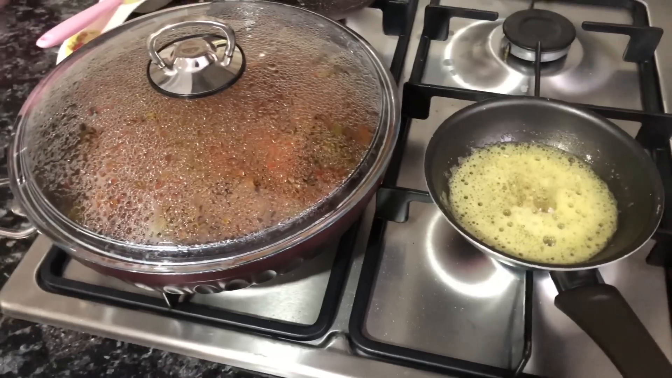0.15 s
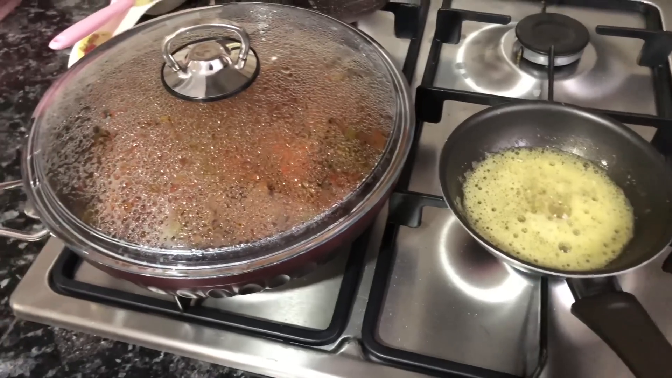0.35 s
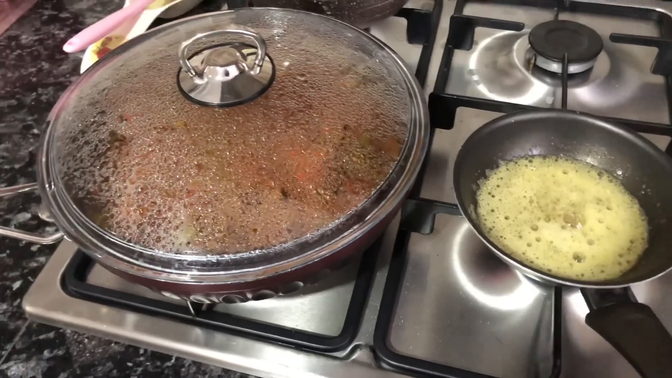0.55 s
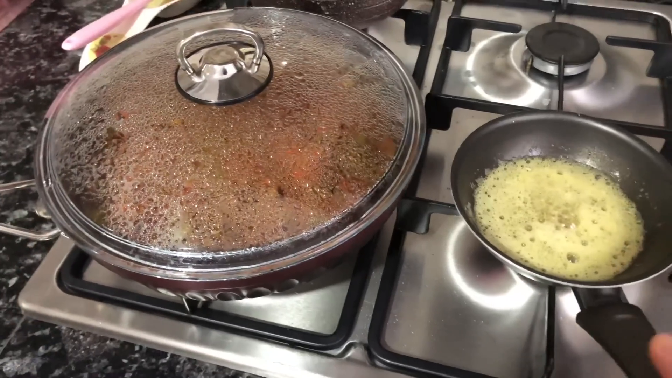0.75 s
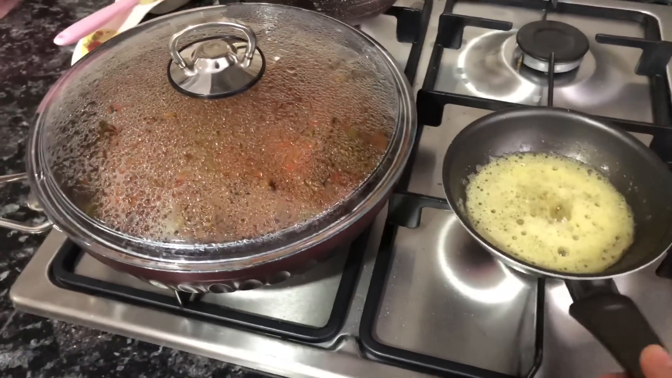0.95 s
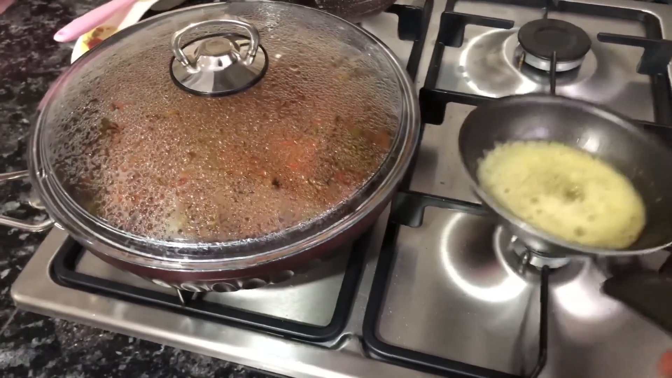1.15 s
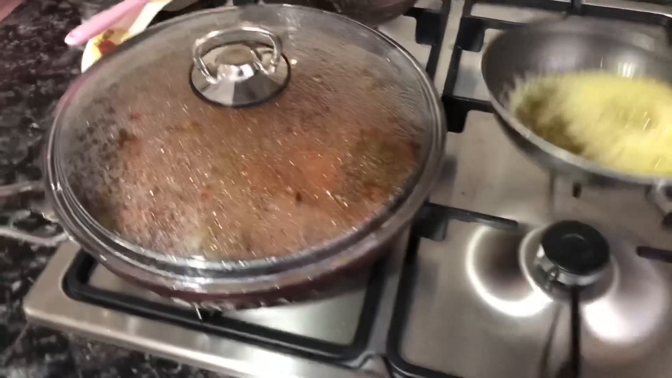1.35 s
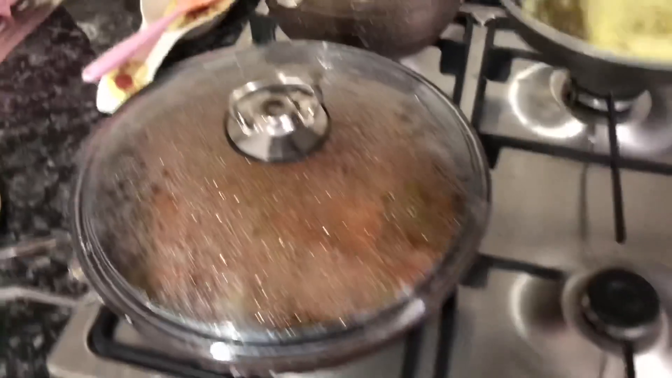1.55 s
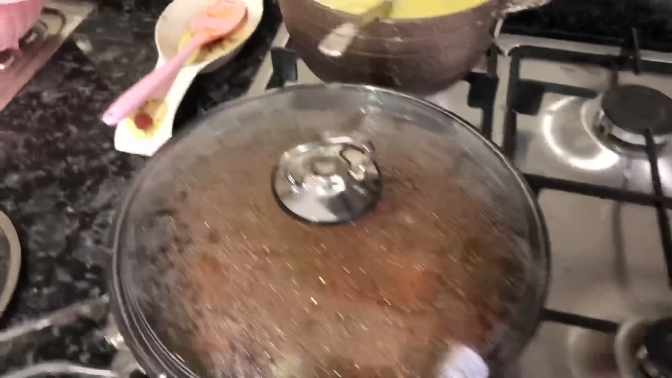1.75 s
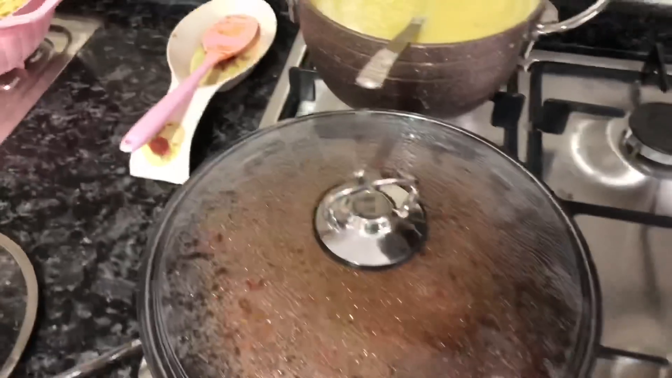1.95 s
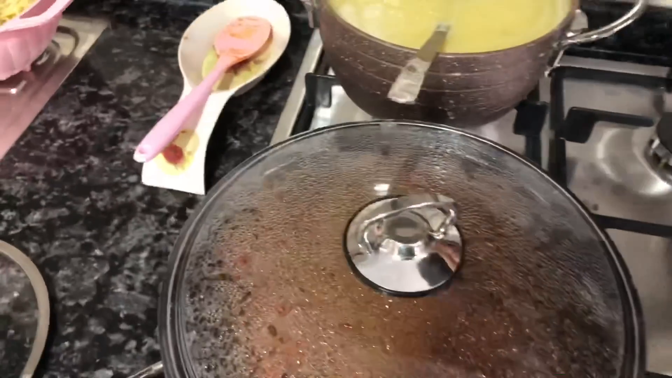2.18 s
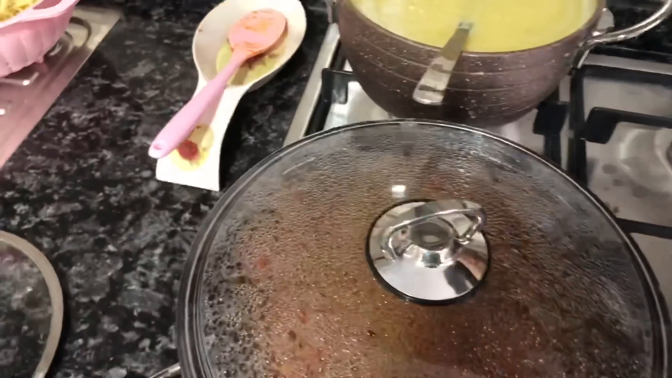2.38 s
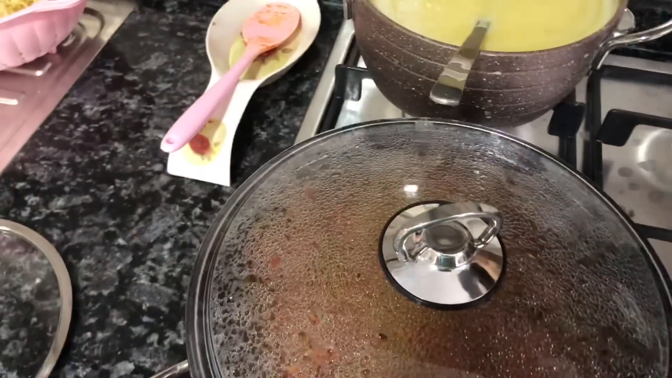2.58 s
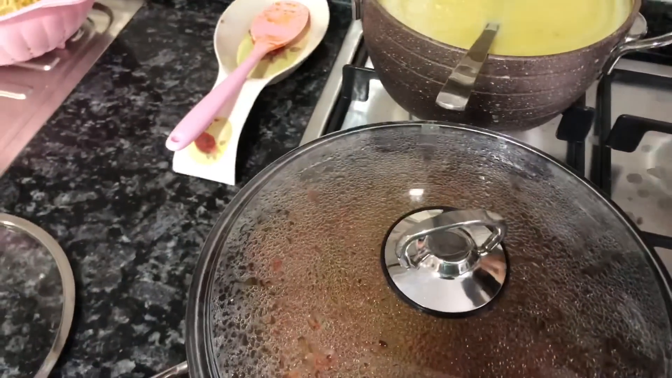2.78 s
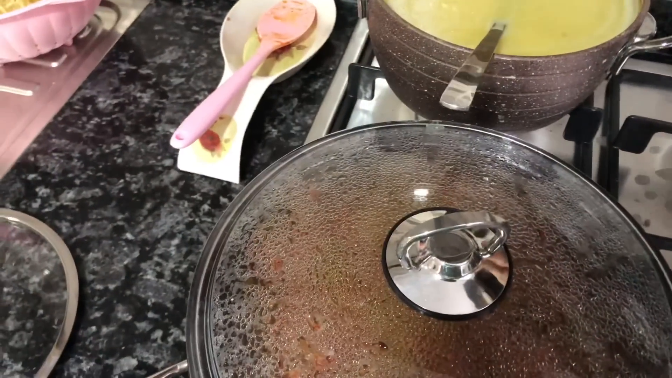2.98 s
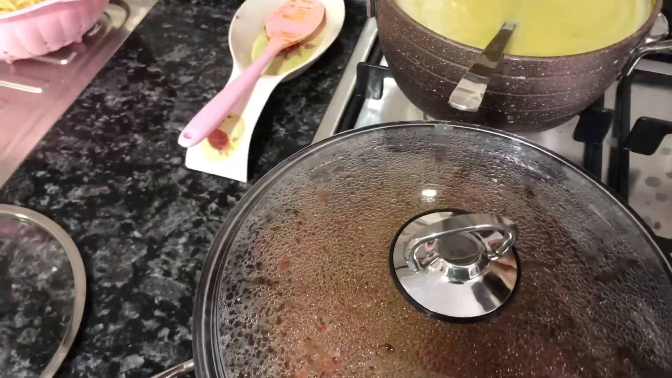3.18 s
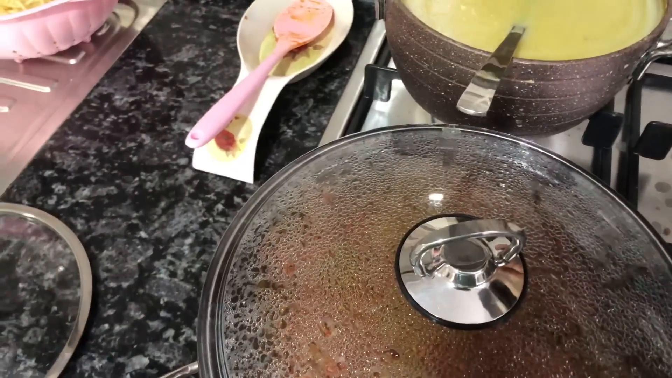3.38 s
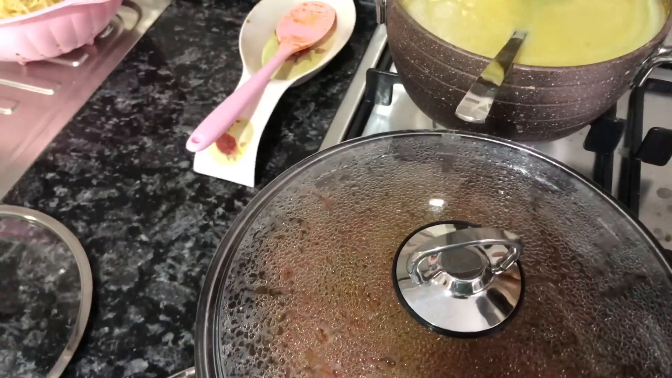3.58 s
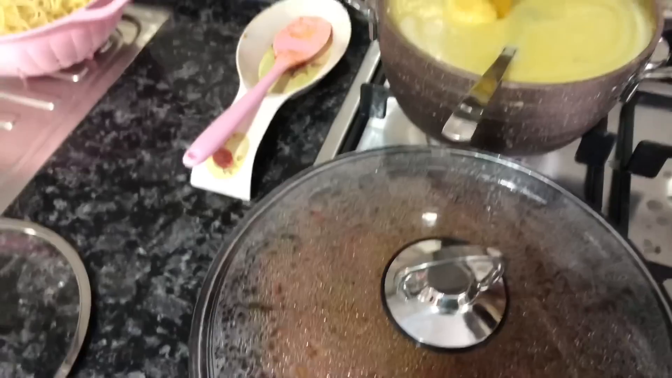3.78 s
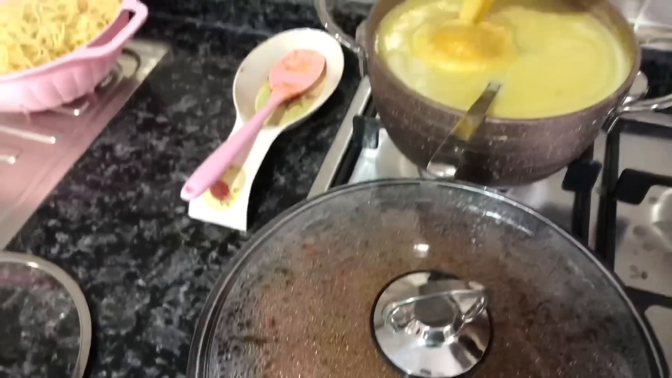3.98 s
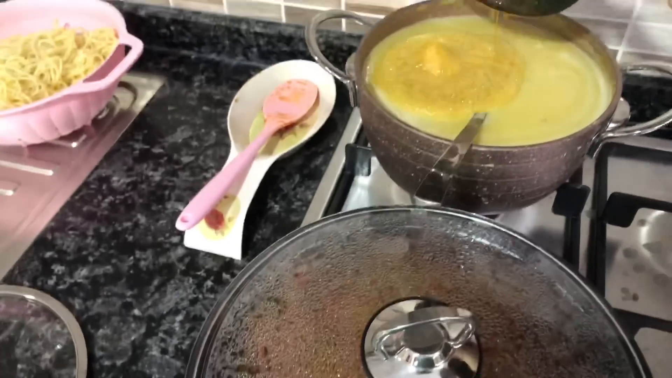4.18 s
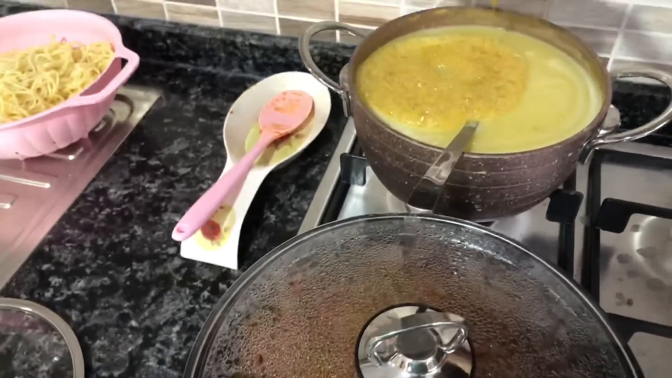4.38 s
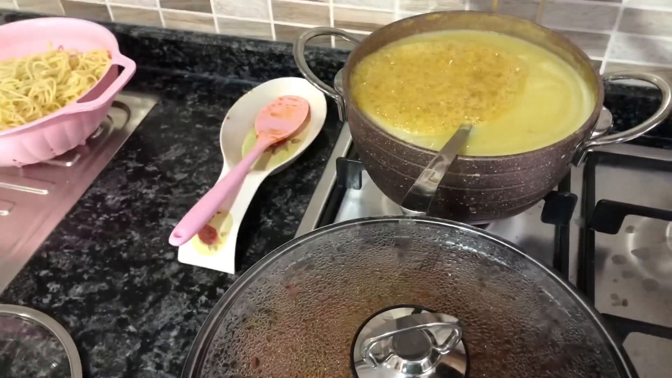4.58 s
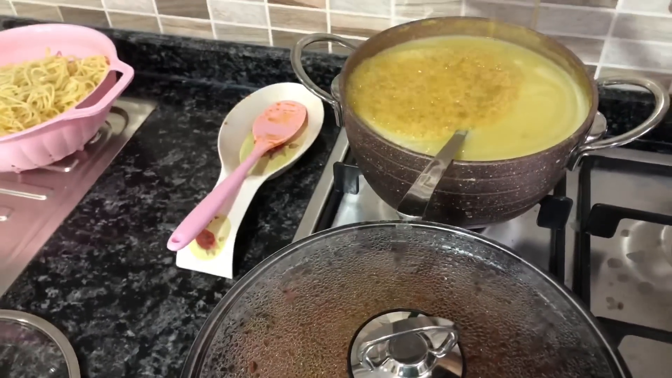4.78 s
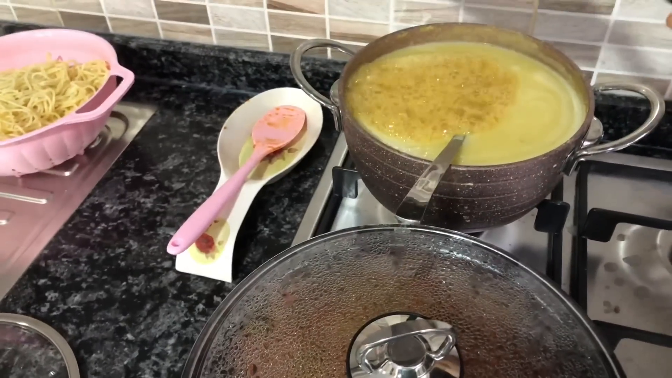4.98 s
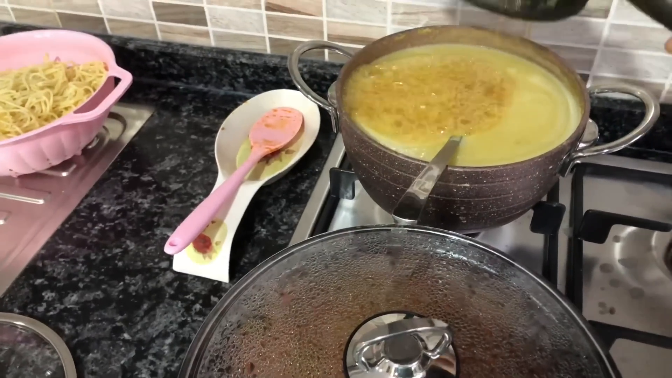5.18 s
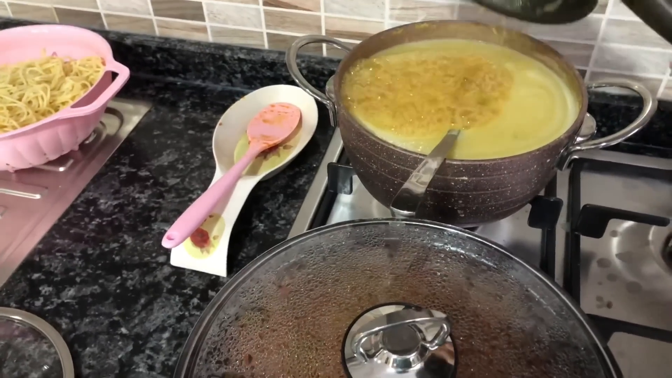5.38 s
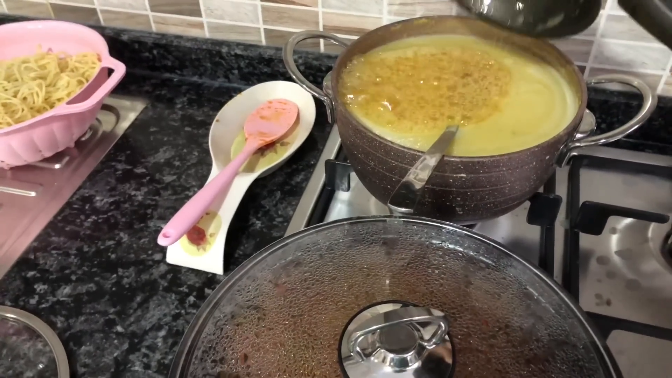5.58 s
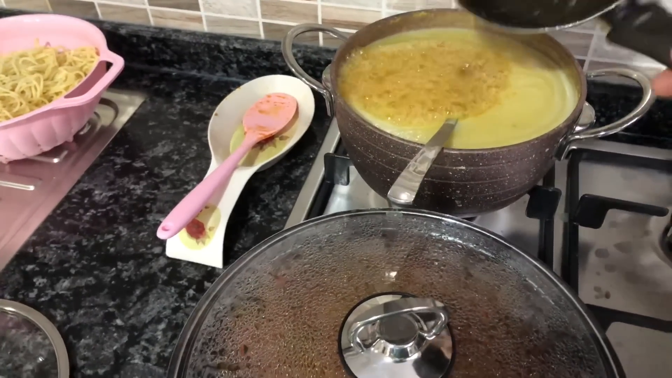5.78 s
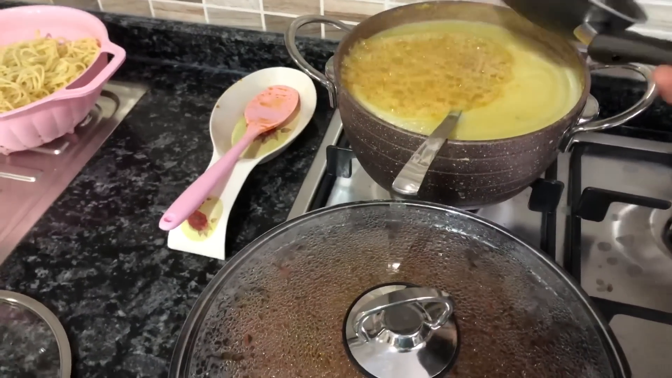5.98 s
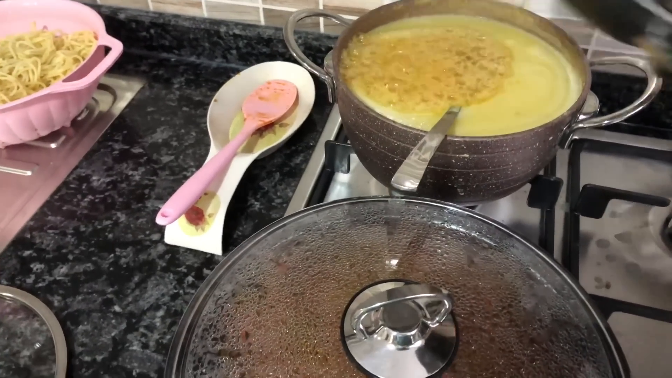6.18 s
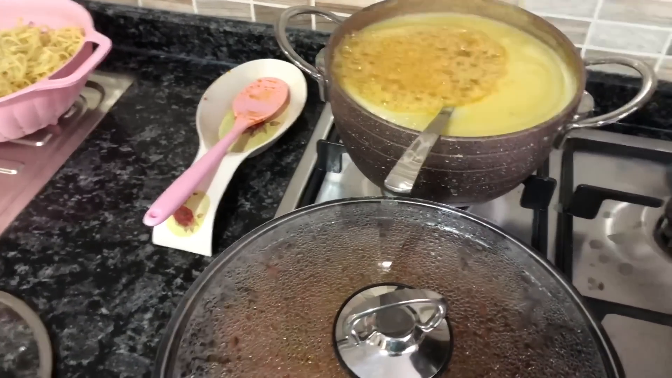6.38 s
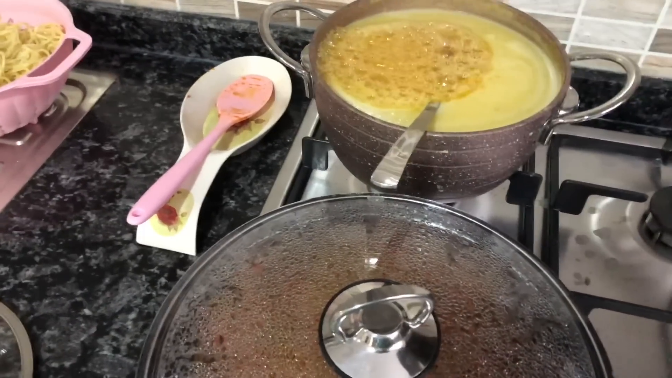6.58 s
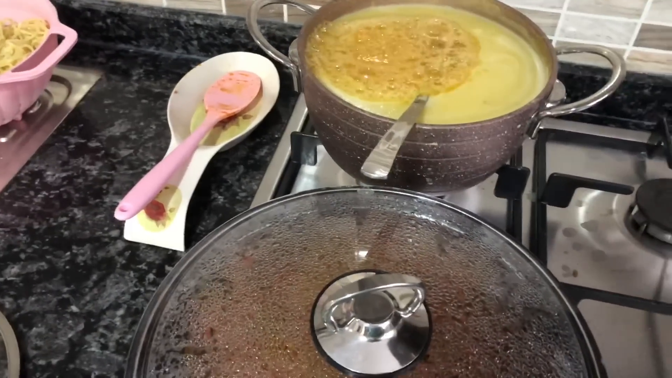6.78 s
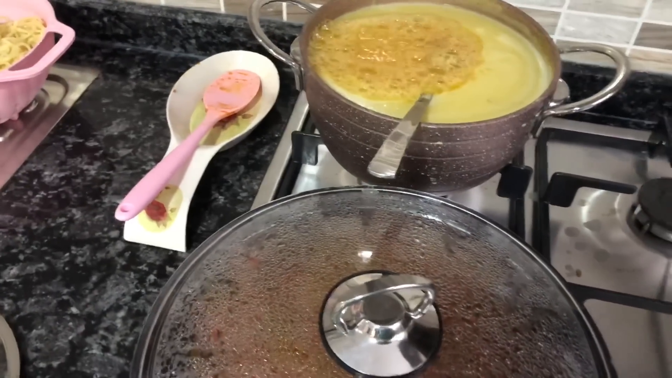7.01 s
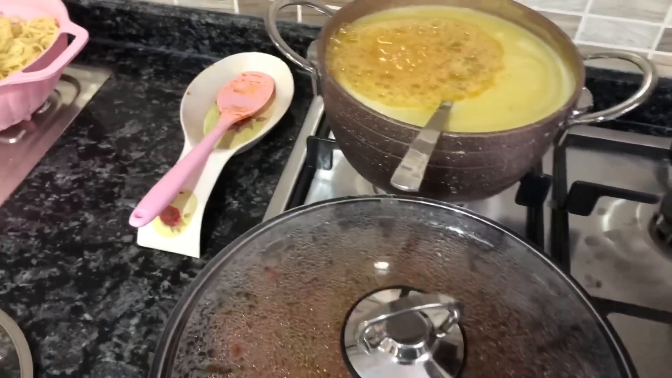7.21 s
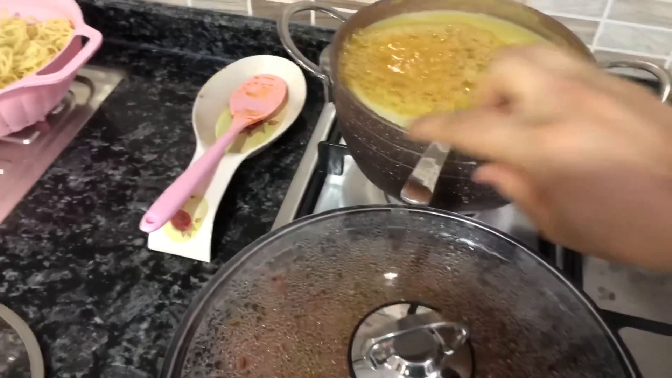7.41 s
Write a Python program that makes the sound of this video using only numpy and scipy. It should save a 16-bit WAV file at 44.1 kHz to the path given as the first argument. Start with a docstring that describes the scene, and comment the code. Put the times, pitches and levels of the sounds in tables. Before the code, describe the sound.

Close up in a small kitchen, a metal pan rattles and scrapes on a stove grate while butter faintly fizzes and spits. Isolated snaps quicken, then hot fat hits soup in a huge distorted sizzle. It thins to crisp, scattered pops; the pan clinks hard on the pot, followed by a small knock and scrape. A low fan hum stays underneath.

```python
"""Butter poured on soup

Butter crackles and foams in a small pan that rattles, scrapes and knocks on the grate of a gas stove.
Tipped over a pot of soup, first drops spit, then fat roars into overload and thins to single pops; a fan hums.
Fat is short noise bursts over dense filtered clicks and hiss; metal is struck or rubbed resonances,
and the kitchen is banded noise with a short tail. The pan clinks on the pot near the end.
"""
import sys
import numpy as np
from scipy import signal
from scipy.io import wavfile

SR = 44100
rng = np.random.default_rng(int(sys.argv[2]) if len(sys.argv) > 2 else 0)


def how_loud(loudness_db):
    """Turn decibels into a plain amplitude multiplier (0 dB gives 1, 20 dB gives 10)."""
    steps = np.asarray(loudness_db, float) / 20
    return 10 ** steps


def wav_record(signal):
    """Record a signal, one row per channel, as 16-bit PCM in the file named by sys.argv[1]."""
    frames = np.transpose(np.atleast_2d(signal))
    bounded = np.clip(frames, -1, 1)
    # unit amplitude maps onto the largest positive 16-bit level
    quanta = np.round(bounded * 32767).astype(np.int16)
    wavfile.write(sys.argv[1], SR, quanta)


N = 328545

# roar of fat on soup over time: time_s, roar_db, treble_db (above 9 kHz, relative to the roar)
SIZZLE = [(3.44, -47, -8), (3.64, -21.5, -7), (3.81, -10, -5), (4.06, -3.5, -6), (4.35, -9.5, -9),
          (4.75, -18, -8.5), (4.95, -22, -9.5), (5.2, -24, -9), (5.4, -29, -5), (6.0, -37.5, -6),
          (6.62, -40, -3.5), (6.8, -44.5, -2), (7.45, -49, -5)]
# resonances of the stove's hob sheet: mode_hz, width_hz, gain_db
HOB = [(112, 28, -9), (156, 18, -10.5), (190, 60, -8.5), (249.4, 49, -4.5), (316, 17.7, 0), (391, 9.8, -8)]
# resonances of the grate: mode_hz, width_hz, gain_db
GRATE = [(528, 18, 0), (672, 30, -11), (860, 60, -17), (1020, 30, -11), (1175, 40, -12), (1348, 20, -9),
         (1535, 30, -17), (1900, 100, -22), (2300, 200, -24)]
# loudest single pops of fat, in the pan and then on the soup:
# time_s, peak_db, pitch_hz, dull_db (thud relative to the snap), tick_db (bright tick relative to the snap)
POPS = [(0.1364, -39, 9910, -20, 3), (0.456, -31.5, 2260, -17, 4), (.6661, -30.5, 13400, -19, -11),
        (.8573, -29, 2380, -6, 1), (.9696, -21.5, 7000, -13.5, -12), (1.0715, -24, 4050, -7.5, -21),
        (1.1583, -18, 8050, -17.5, -13), (1.4304, -26.5, 10030, -6, -16), (1.4537, -26, 4440, -10, -7),
        (1.509, -19.5, 6300, -15, -7), (1.66, -31.5, 5120, -24, -13), (1.594, -26, 4600, -14, -15),
        (2.0078, -28.5, 10160, -26, -12), (2.073, -17.5, 5600, -39, -32), (2.1738, -12.5, 3220, -29, -11.5),
        (2.215, -18.5, 3100, -22, -7), (2.317, -25.5, 7800, -26, -20), (2.4606, -22, 5340, -31, -1),
        (2.5207, -29, 4180, -13, -12), (2.048, -29.5, 3960, -21, -3), (1.6296, -32.5, 3700, -9, -22),
        (2.5487, -28.5, 2650, -19, -4), (2.7485, -28, 6800, -10, -3), (2.6123, -17, 5760, -13, -5),
        (2.6222, -13, 5400, -43, 0), (2.6955, -23, 9500, -21, -10), (2.766, -19.5, 6640, -17, -7),
        (2.7808, -20, 6120, -13, -6), (2.8102, -14, 9000, -16, -7), (2.813, -8.5, 5830, -17.5, -4),
        (3.1384, -21.5, 3860, -6.5, -1), (3.2065, -20.5, 6900, -7.5, -4), (3.2107, -19.5, 5130, -32, -20),
        (3.3044, -13, 3340, -35, -7), (3.357, -7, 4200, -53, -22), (3.422, -11, 6000, -23, -21),
        (3.4254, -4.5, 3080, -6, -11.5), (3.4847, -18, 4840, -6, -26), (3.4962, -0.5, 4200, -23, -34),
        (3.5465, -10, 6100, -7, -9), (3.5625, -20, 1500, -16, -10), (3.588, -14.5, 2980, -3, -13),
        (3.669, -8, 4500, -4, -3.5), (3.612, -1, 5300, -10, -5), (3.6483, 2, 5300, -8, -3.5),
        (3.7105, 2.5, 4740, -8, -4), (4.791, 6.5, 5170, -18, -8.5), (4.831, -1, 6330, -23, -3),
        (4.9471, 1.5, 6550, -18, -5), (5.0586, -13, 5900, -11.5, 5), (5.166, -.5, 5200, -31, -28),
        (5.2552, -4.5, 2700, -3.5, -14), (5.2943, -1.5, 4400, -8, -11), (5.338, -4.5, 5860, -7, -5),
        (5.3757, -5.5, 4520, -8.5, -16), (5.4165, -4.5, 5960, -16, -6), (5.4756, -7.5, 5950, -27, -22.5),
        (5.5147, -1.5, 6040, -36, -15.5), (5.587, -8.5, 3430, -7, -26), (5.63, -7, 4670, -5, -13),
        (5.691, -2.5, 6500, -13.5, -1.5), (5.752, -14, 2180, 6.5, -21), (5.7631, -5.5, 5100, -10, -20),
        (5.827, -8, 4450, -14, -22), (5.8811, -5, 3460, -6, -28), (5.998, -8, 4850, -11.5, -9),
        (6.0486, -9.5, 6940, -14.5, -9), (6.1534, -8, 2000, 0, -8), (6.1842, -10.5, 5640, -13, -27),
        (6.2012, -10, 6660, -37, -1), (6.2141, -4.5, 6700, -18, 1), (6.253, -8.5, 12400, -17, -6),
        (6.268, -11, 5800, -3, -10), (5.01, -9.5, 11400, -28, -3), (5.789, -14, 14300, -21, -6),
        (6.13, -19.5, 7060, -23, -15), (6.2988, -18, 12360, -32, -13), (7.154, -20, 10940, -8.5, -11),
        (6.3278, -11.5, 6800, -9.5, -11), (6.55, -11, 6940, -20, -12), (6.6493, -16, 7960, -7, -15),
        (6.731, -13.5, 5570, -21, -19), (6.772, -13.5, 11800, -18, -30), (6.8533, -15.5, 5800, -6.5, -32),
        (6.9733, -4, 6160, -15, -2), (7.0134, -24, 1530, 12.5, 12), (7.1282, -11.5, 5600, -16, -21),
        (7.1402, -11, 6800, -15, -20), (7.182, -12, 5040, -8.5, -16)]
TIPPED_S, POURED_S = 3, 4   # pops move from pan to soup; after the first lone drops


def rms_one(x):
    """Scales a signal to an rms of 1."""
    return x / np.sqrt(np.mean(x ** 2) + 1e-20)


def in_time(rows, outside=None):
    """Draws each column of a time table as a curve over the scene."""
    s, *columns = np.transpose(rows)
    return [np.interp(np.arange(N) / SR, s, c, outside, outside) for c in columns]


def at_hz(points, hz):
    """Reads a colour curve along log frequency."""
    curve_hz, curve_db = np.array(points)[:, 0], np.array(points)[:, 1]
    return np.interp(np.log(hz), np.log(curve_hz), curve_db)


def drift(pole_hz):
    """Slow random wander with an rms of 1: noise through two equal low-pass poles."""
    r = np.exp(-80 * np.pi * pole_hz / SR)   # one step is 40 samples
    noise = rng.standard_normal(N // 40 + 2002)
    slow = signal.lfilter([1], [1, -2 * r, r * r], noise)[2000:]
    return np.interp(np.arange(N) / 40, np.arange(len(slow)), rms_one(slow))


def resonate(x, hz, width_hz):
    """One mode: a click of 1 rings as a dying sine that starts from a height of 1."""
    r = np.exp(-np.pi * width_hz / SR)
    w = 2 * np.pi * min(hz, .45 * SR) / SR
    return signal.lfilter([0, np.sin(w)], [1, -2 * r * np.cos(w), r * r], x + 1e-18)


def body(x, modes):
    """Parallel resonances of alternating sign, each with about its gain in dB at its top."""
    out = 0
    for k, (hz, width_hz, gain_db) in enumerate(modes):
        gain = how_loud(gain_db) * 2 * np.pi * width_hz / SR
        out = out + (-1) ** k * gain * resonate(x, hz, width_hz)
    return out


def cut(x, hz, kind, order=2):
    """Butterworth filter."""
    return signal.sosfilt(signal.butter(order, hz, kind, fs=SR, output="sos"), x)


def grains(per_s, spread_db):
    """Random clicks of either sign, most small and a few large."""
    size = how_loud(spread_db * np.minimum(rng.exponential(1, N), 4.0))
    size = size * rng.choice([-1, 1], N)
    fires = rng.random(N) < per_s / SR
    return size * fires / np.sqrt(per_s / SR)


def pops(events, t60=0.0067, bowl_db=-14, bowl_t60=0.044, spread=1.288):
    """A steam pocket bursts: a snap and droplet spray at its pitch, a thud and a tick, then scatter in the bowl."""
    out, t = np.zeros(N + 3072), np.arange(3072) / SR
    dying = how_loud(-60 * t / t60) + how_loud(bowl_db - 60 * t / bowl_t60)
    fading = how_loud(-60 * t / 0.16)      # extra fading of the tick
    for s, peak_db, hz, dull_db, tick_db in events:
        snap = 0.34 * rng.standard_normal(len(t)) * dying + 0.93 * (t == 0)
        voice = cut(snap, [hz / spread, min(hz * spread, .45 * SR)], "band")
        thud = cut(snap, [800, 2300], "band")
        tick = cut(snap * fading, [9000, 15000], "band")
        burst = 0
        for part, part_db in ((voice, 0), (thud, dull_db), (tick, tick_db)):
            burst = burst + how_loud(part_db) * part / np.abs(part).max()
        at = round(s * SR)
        out[at:at + len(t)] += how_loud(peak_db) * burst
    return cut(out[:N], 730, "high", order=4)


def small_pops(start_s, end_s, peak_db, count):
    """Rows for lesser pops at random moments, scattered in size and colour around typical values."""
    typical_hz, typical_dull_db, typical_tick_db = 5600, -17, -16
    s, z = rng.uniform(start_s, end_s, count), rng.standard_normal((count, 4))
    level_db = peak_db[(s * SR).astype(int)] + 2.5 * z[:, 0]
    hz = np.clip(typical_hz * 1.265 ** z[:, 1], 1000, 13000)
    dull_db = typical_dull_db + 6.0 * z[:, 2]
    tick_db = typical_tick_db + 2.2 * z[:, 3]
    return list(zip(s, level_db, hz, dull_db, tick_db))


def room_tone():
    """Third-octave noise bands of kitchen air, flickering a little, and a fan's narrow wavering noise lines."""
    # colour of the air, balanced apart below and above 700 Hz: band_hz, density_db (relative, per Hz)
    air_colour = [(15, -56), (25, -29), (70, -2.5), (161, -11.5), (236, -6.5), (309, -12), (335, -9.5),
                  (695, -20.5), (1610, -29), (1840, -26.5), (2000, -27.5), (2690, -31), (5570, -34),
                  (7110, -39), (16000, -37)]
    # low air and fan over time, before their mixing gains: time_s, level_db
    air_level = [(0, -44), (3.65, -44.5), (4.06, -40), (5.06, -41), (6.3, -41), (7.45, -41)]
    # hum lines of the fan: line_hz, width_hz, level_db (relative)
    fan_lines = [(65, 2.9, 0), (100.6, 2.2, -7.5), (137.4, 4.3, -8.5), (185, 6.3, -7.5)]
    treble_db = -52
    low_db, = in_time(air_level)
    edges = 25 * 2 ** np.arange(0, 9.4, 1 / 3)
    white = rng.standard_normal((2, N))
    low, high = 0, 0
    for k, (a, b) in enumerate(zip(edges, edges[1:])):
        hz = np.sqrt(a * b)
        band = cut(white[k % 2], [a, b], "band") * how_loud(at_hz(air_colour, hz) + drift(9))
        if hz < 700:
            low = low + band
        else:
            high = high + band
    fan = 0
    for hz, width_hz, level_db in fan_lines:
        fan = fan + how_loud(level_db) * rms_one(resonate(rng.standard_normal(N), hz, width_hz))
    return how_loud(low_db) * (0.58 * rms_one(low) + how_loud(-4) * fan) + how_loud(treble_db) * rms_one(high)


def echoes(x):
    """The dull tail of the kitchen: band-limited noise that dies away, starting 4 ms after the sound."""
    t60_s, tail_db = 0.33, -16.5
    t = np.arange(SR // 2) / SR
    walls = cut(rng.standard_normal(len(t)), [500, 7000], "band", order=1)
    walls = walls * how_loud(-60 * t / t60_s) * (t > .004)
    return signal.fftconvolve(x, how_loud(tail_db) * walls / np.linalg.norm(walls))[:N]


def drag():
    """Dense stick-slip clicks shake the hob sheet and the grate; each stroke rises, holds and fades."""
    # strokes of the pan over the stove: start_s, rise_s, held_s, boom_db (hob sheet), grind_db (grate)
    strokes = [(-.02, .015, 0.084, -39, -42.5), (0.507, 0.012, 0.057, -36.5, -27.5),
               (0.713, 0.014, 0.021, -19.5, -24.5), (1.36, 0.0073, 0.0081, -64, -49),
               (6.711, .008, 0.0062, -31.5, -29), (7.329, 0.1, .05, -22.5, -35.5)]
    boom_db_per_s, grind_db_per_s = 226, 294   # fading after the stroke
    boom, grind, t = np.zeros(N), np.zeros(N), np.arange(N) / SR
    for start_s, rise_s, held_s, boom_db, grind_db in strokes:
        rise = np.clip((t - start_s) / rise_s, 0, 1)
        after = np.maximum(t - start_s - rise_s - held_s, 0)
        boom = boom + rise ** 2 * how_loud(boom_db - boom_db_per_s * after)
        grind = grind + rise * how_loud(grind_db - grind_db_per_s * after)
    slips = grains(4000, spread_db=2.5)
    hob = rms_one(body(slips, HOB))
    grate = rms_one(cut(body(slips, GRATE), 1370, "low", order=3))
    return boom * hob + grind * grate


def rattle():
    """Each touch strikes the modes of the pan with strengths of its own, with a short crack."""
    # pan touching the grate or the pot: time_s, peak_db (of the crack), crack_hz
    single_touches = [(.0512, -26, 2360), (.1023, -26.5, 2010), (.1045, -27.5, 12000), (.2167, -28, 2500),
                      (.2523, -32, 1970), (.268, -30.5, 2850), (.2895, -19.5, 2020), (.3596, -31, 1980),
                      (.402, -28.5, 2030), (.4518, -25, 2440), (.5463, -18.5, 1350), (.5844, -31, 1340),
                      (.621, -31.5, 2900), (.7007, -23, 2020), (.7144, -11, 2240), (.7298, -16.5, 6100),
                      (.778, -35, 1500), (1.025, -32.5, 980), (1.367, -26.5, 890), (1.427, -31.5, 940),
                      (1.772, -32, 1980), (6.6962, -22.5, 1280), (6.7191, -10, 5160), (6.7437, -31, 1100)]
    # modes of the pan: mode_hz, width_hz, level_db (relative)
    pan_modes = [(944, 190, -15.5), (1350, 28, -9.5), (2020, 140, 0), (2500, 110, -4), (2900, 370, -12),
                 (3260, 60, -41), (3710, 68, -8.5), (4050, 63, -17), (4460, 77, -35), (5430, 180, -4)]
    # pulled free, the pan chatters eight times, each touch typically weaker
    chatter_s, gap_s, chatter_db, chatter_hz, loss_db = .719, .0055, -8.5, 1570, 2.1
    chatter = []
    for k, (a, b, c) in enumerate(rng.standard_normal((8, 3))):
        touch_s = chatter_s + gap_s * (k + 0.23 * a)
        chatter.append((touch_s, chatter_db - loss_db * k + 1.3 * b, chatter_hz * 1.5 ** c))
    touches = single_touches + chatter
    at = np.round(np.array(touches)[:, 0] * SR).astype(int)
    peak_db = np.array(touches)[:, 1]
    strength_db, out = rng.normal(0, 3, (len(at), len(pan_modes))), np.zeros(N)
    for k, (hz, width_hz, mode_db) in enumerate(pan_modes):
        clicks = np.zeros(N)
        clicks[at] = how_loud(peak_db + mode_db - 12 + strength_db[:, k])
        out += resonate(clicks, hz, width_hz)
    cracks = pops([(s, db, hz, -10, -15) for s, db, hz in touches], t60=0.029, spread=1.4)
    return out + cracks


def ring(x, hz, t60_s):
    """One mode of a metal wall, its width set by the time it takes to die by 60 dB."""
    return resonate(x, hz, np.log(1000) / np.pi / t60_s)


def pot(x):
    """The steel wall of the pot rings in its modes."""
    # modes of the pot wall: mode_hz, gain_db, t60_s
    wall_modes = [(964, -26, .25), (1308, -22, .25), (1486, -19, .27), (1570, -11, .24), (1584, -12, .28),
                  (1614, -15, .35), (1641, -21, .38), (1720, -21, .15), (2272, -17, .18), (2396, -8, .05),
                  (3090, -18, .38), (3108, -10, .18), (3127, -15, .31), (3164, -12, .12), (3591, -22, .12),
                  (4830, -14, .06), (5028, -22, .2), (6110, -30, .15), (6330, -20, .05), (7500, -36, .15),
                  (7569, -34, .15)]
    return sum(how_loud(db) * ring(x, hz, t60_s) for hz, db, t60_s in wall_modes)


def clink():
    """One hard blow: the pot rings on, the pan rings loudly until it settles against the rim, the hob booms."""
    clink_s = 6.4813
    # ring of the held pan: mode_hz, gain_db, t60_s, settles_s, damping_t60_s (added once settled)
    pan_ring = (1597, 4, .3, 6.505, .008)
    blow = 1. * (np.arange(N) == round(clink_s * SR))
    hz, gain_db, t60_s, settles_s, damping_t60_s = pan_ring
    resting = np.maximum(np.arange(N) / SR - settles_s, 0)
    pan = how_loud(gain_db - 60 * resting / damping_t60_s) * ring(blow, hz, t60_s)
    boom = how_loud(39.5) * body(blow, HOB + GRATE)
    crack = pops([(clink_s, 4, 2400, -6, -14)], t60=0.031, bowl_db=0, bowl_t60=0.11)
    return pot(blow) + pan + boom + crack


def butter():
    """The foaming butter fizzes faintly and spits; the thin pan wall rings along."""
    # fizz of the butter foam, before the pan wall adds to it: time_s, level_db
    foam = [(0.0, -60.5), (1.82, -63.5), (2.52, -58.5), (2.69, -59), (2.96, -65), (3.18, -62), (3.4, -55)]
    # resonances of the thin pan wall: mode_hz, width_hz, gain_db
    thin_wall = [(1720, 29, 9.5), (4390, 49, 2), (5300, 57, 5), (6100, 47, 3.5), (6800, 44, 0.5),
                 (7900, 71, -6), (9350, 55, 1), (10740, 230, -13)]
    small_db = -30.5   # typical peak of a small spit
    fizz_db, = in_time(foam, outside=-120)
    crackle = grains(1500 * how_loud(3.5 * drift(10)), spread_db=2.5)
    spits = [p for p in POPS if p[0] < TIPPED_S]
    spits = spits + small_pops(0, TIPPED_S, np.full(N, small_db), count=16)
    fat = pops(spits, t60=0.016, bowl_db=-3.5, bowl_t60=0.052, spread=1.47)
    fat += how_loud(fizz_db) * rms_one(cut(crackle, [3500, 9000], "band"))
    return fat + how_loud(1) * body(fat, thin_wall)


def sizzle():
    """Countless small bursts ring a few cycles each at pitches all over the range, clumped, on a smooth hiss."""
    # colour of the roar, balanced apart below 2.5 kHz, up to 9 kHz and above: band_hz, density_db (relative, per Hz)
    roar_colour = [(120, -49), (200, -22.5), (304, -7.5), (455, -24), (831, -2), (1200, -8.5), (1360, 1.5),
                   (2000, -3.5), (2230, 6), (2870, -14.5), (3150, -7), (6190, -5), (8920, -15.5),
                   (15700, -20.5)]
    body_db, body_per_db = -6, .1   # below 2.5 kHz, relative to the roar at full boil; loss per dB of cooling
    hiss_share, hiss_per_db = 0.32, -0.0951   # smooth share at full boil; lost per dB of cooling (negative: gained)
    roar_db, treble_db = in_time(SIZZLE)
    poured = np.arange(N) > SIZZLE[0][0] * SR
    cooled_db = roar_db.max() - roar_db
    hiss = np.clip(hiss_share - hiss_per_db * cooled_db, 0, 1)
    bursts = rms_one(grains(1500 * how_loud(3.5 * drift(30)), spread_db=4.5))   # density wanders around 1500 per s
    white = rng.standard_normal((2, N))
    pitches = np.geomspace(235, 15300, 30)
    near = rng.integers(-2, len(pitches) + 2, N)      # a burst covers up to five neighbouring bands
    parts = np.zeros((3, N))
    for k, hz in enumerate(pitches):
        grainy = 2.5 * bursts * (np.abs(near - k) <= 2)
        drive = np.sqrt(1 - hiss) * grainy + np.sqrt(hiss) * white[k % 2]
        band = cut(drive, [hz / 1.075, hz * 1.075], "band")
        part = int(hz > 2500) + int(hz > 9000)
        parts[part] += band * how_loud(at_hz(roar_colour, hz) + 1.2 * drift(10))
    low, mid, top = map(rms_one, parts)
    low = low * how_loud(body_db - body_per_db * cooled_db)
    return poured * how_loud(roar_db + .5 * drift(18)) * (mid + low + how_loud(treble_db) * top)


def scene():
    """Everything stands close to one microphone; the first lone drops splash for longer than later pops."""
    first_drops = [p for p in POPS if TIPPED_S < p[0] < POURED_S]
    drops = pops(first_drops, t60=0.014, bowl_db=-11, bowl_t60=0.052, spread=1.37)
    small_db = in_time(SIZZLE)[0] + 15   # typical small peaks stand 15 dB above the roar
    lesser = small_pops(SIZZLE[0][0], N / SR, small_db, count=60)
    lesser = lesser + small_pops(4.4, 6.1, small_db, count=150)   # the roar breaks up into a crowd
    soup = drops + pops([p for p in POPS if p[0] > POURED_S] + lesser) + sizzle()
    pot_ring = pot(how_loud(-73) * soup + how_loud(-36.5) * cut(drops, 2100, "low"))
    near = soup + pot_ring + butter() + rattle() + drag() + clink()
    return (near + echoes(near) + room_tone())[None]


def top_cut(x):
    """Nothing passes above the cut-off."""
    return signal.sosfilt(signal.butter(12, 16780, fs=SR, output="sos"), x)


def record(dry):
    """The microphone overloads: the loudest moments are clipped flat."""
    clipped = np.clip(dry, -1.0, 1.0)
    return top_cut(clipped)


dry = scene()
out = record(dry)
wav_record(out)
```